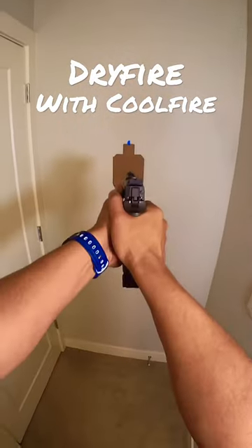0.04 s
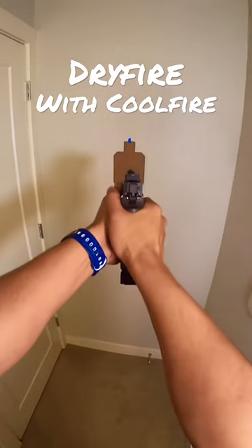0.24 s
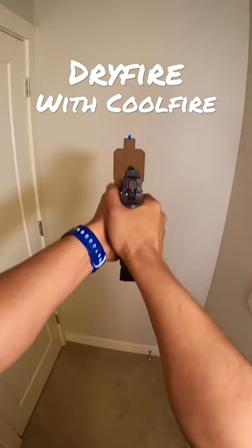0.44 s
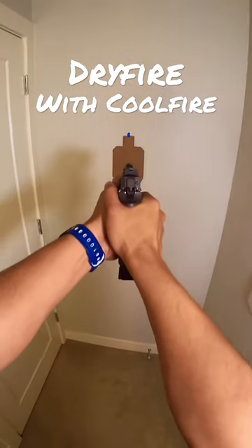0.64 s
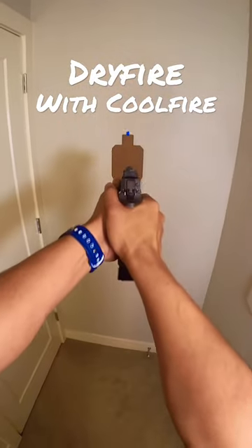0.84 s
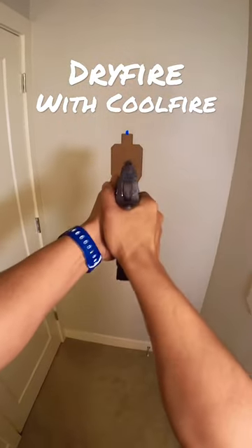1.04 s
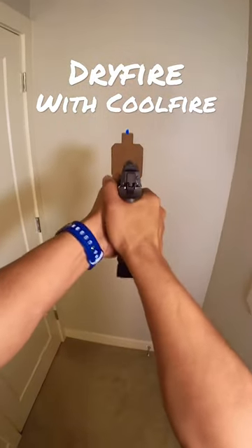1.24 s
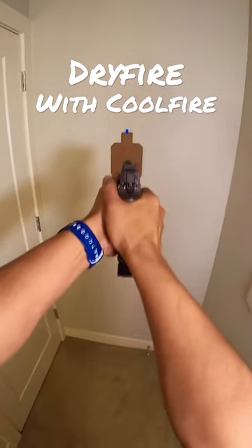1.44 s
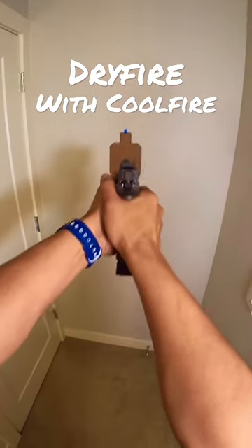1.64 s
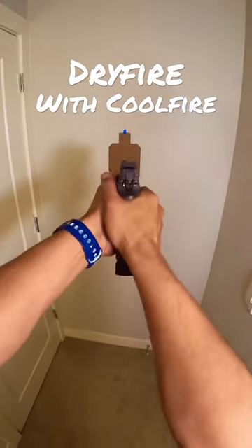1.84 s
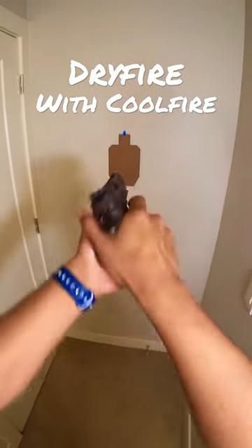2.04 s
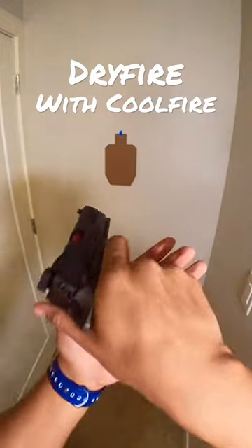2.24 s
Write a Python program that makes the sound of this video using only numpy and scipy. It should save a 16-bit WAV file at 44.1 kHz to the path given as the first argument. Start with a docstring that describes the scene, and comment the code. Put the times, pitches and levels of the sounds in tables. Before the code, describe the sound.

A gas-recoil training pistol fires ten rapid shots close by in a small bare room. Tiny trigger clicks come at about 0.2 seconds, then the shots follow at once, nearly six a second, the last slightly delayed at 1.9 seconds. Each is a pop, gas hiss and ringing slide clatter, blurred by boomy reverberation. Around 2.3 seconds, hands rub softly on the grip over faint air noise.

```python
"""A pistol with a gas recoil trainer is fired ten times in a small bare room.
Over faint air noise, the trigger is taken up with small scraping clicks. In each cycle the hammer
falls, the valve pops, gas puffs out, and the slide hits its rear stop and slams shut, ringing.
The room booms and reverberates; a limiter holds it at one level, so the shots run together as
noisy bursts. Last, the hands rub softly on the grip."""
import sys
import numpy as np
from scipy import signal
from scipy.fft import rfft, irfft
from scipy.io import wavfile
from scipy.ndimage import uniform_filter1d

SR = 44100
rng = np.random.default_rng(int(sys.argv[2]) if len(sys.argv) > 2 else 0)


def bounce(signal):
    """Save signal as a 16-bit WAV file at the path given by the first command-line argument."""
    frames = np.transpose(np.atleast_2d(signal))
    limited = np.clip(frames, -1, 1)
    pcm = np.round(limited * 32767).astype(np.int16)
    wavfile.write(sys.argv[1], SR, pcm)


N = 105840
T = np.arange(N) / SR

# background air spectrum: f/Hz, level/dB
AIR_SPECTRUM = [(18, -67), (30, -27.5), (200, -9.5), (426, -11), (485, -14), (3070, -21.5), (8920, -31.5),
                (9890, -25), (10700, -36), (15000, -44.5)]
# reverb spectrum: f/Hz, level/dB
REVERB_SPECTRUM = [(100, -13.5), (300, 7.5), (500, 7.5), (900, 10), (1500, 2.5), (3000, -2.5), (6000, 6.5),
                   (10000, 3), (15000, -13)]
# reverb decay: f/Hz, t60/s
REVERB_DECAY = [(150, .38), (400, .37), (900, .42), (1500, .37), (3500, .37), (7000, .325), (14000, .23)]
# reverb that stays the same as the pistol moves between shots: f/Hz, power share
REVERB_SHARED = [(500, .97), (1000, .8), (2000, .5), (6000, .3)]
# low room modes: f/Hz, level/dB
ROOM_MODES = [(150, -53.5), (214, -43.5), (287, -44.5), (349, -44.5), (452, -48), (500, -51.5), (587, -42),
              (700, -51.5), (846, -56.5), (890, -59.5)]
# wall echoes of the gas: delay/s, level/dB
WALL_ECHOES = [(.0148, 3), (.0208, -3), (.0275, 3.5)]
# trigger take-up: t/s, level/dB, decay/s, low-pass/Hz
TRIGGER_CLICKS = [(0.189, -57, 0.0033, 8000), (0.202, -39.5, 0.0034, 2700), (0.2159, -35, .004, 5650),
                  (0.222, -22.5, 0.0016, 4493)]
# valve pop and exhaust puff: delay/s, level/dB, low edge/Hz, high edge/Hz
GAS_PULSES = [(-.0003, 26.5, 650, 2400), (.0051, 26, 175, 930)]
# metal contact spectrum: f/Hz, level/dB
CLACK_SPECTRUM = [(60, -42), (150, -22), (400, -6), (1000, -9.5), (1750, 2.5), (2500, 7), (3000, 2),
                  (4300, 1.5), (6000, -0.5), (8600, -2), (10300, 3), (11500, -4.5), (15500, -10)]
# slide and barrel modes: f/Hz, level/dB, t60/s
GUN_MODES = [(1440, -33, .022), (1744, -37, .013), (3285, -30.5, .032), (5530, -44, .012),
             (6550, -34, .028), (6700, -33.5, .022), (7680, -34, .012), (7820, -39, .025)]
# contacts per cycle: delay/s, level/dB, decay/s, low-pass/Hz, low ring/dB, mid ring/dB, high ring/dB
CYCLE_CONTACTS = [(-.0058, -7, 0.0058, 5730, 6, -15.5, -12), (.0117, 0, .003, 4110, -3, -10.5, -19),
                  (.0183, -5.5, 0.012, 7100, 0.5, 9, -13), (0.0294, -5, 0.0055, 6752, 10, 9, 2.5),
                  (.0405, -4.5, 0.012, 7720, -0.5, 3, 4.5), (.056, -11, .012, 6000, 4, 8.5, 9.5),
                  (.076, -3.5, 0.0026, 2846, 3, 3, 1), (.098, -13, 0.031, 5516, 1.5, -1.5, -4)]
# shots, timed at the valve pop: t/s, level/dB, ring pitch ratio, low ring/dB, mid ring/dB, high ring/dB
SHOT_CYCLES = [(.2349, -1.5, 1.012, 1, -2.5, 1.5), (.4324, 0, 1.006, 1.5, 0, 0),
               (.6043, 0, 1.004, 2, -1.5, 1), (.7844, 0, 1.0, 0, 1.5, 1), (.9617, -.5, .999, 2, -1.5, 0),
               (1.1273, -.5, .999, -1, .5, -1.5), (1.3044, -1, .999, 0, -.5, 0),
               (1.4768, -1.5, .999, 0, -1.5, 0), (1.646, -3.5, 1.0, 0, -.5, .5),
               (1.8953, -3, 1.001, -7, -2.5, -3)]


def from_db(db):
    """Decibels to gain."""
    return 10 ** (np.asarray(db) / 20)


def at_hz(points, hz):
    """Table lookup on a log-frequency axis."""
    f, v = np.transpose(points)
    return np.interp(np.log(np.maximum(hz, 1)), np.log(f), v)


def band(x, hz, kind, order=2):
    """Butterworth filter."""
    sos = signal.butter(order, np.clip(hz, 10, .45 * SR), kind, fs=SR, output="sos")
    return signal.sosfilt(sos, x + 1e-18)


def add(out, start_s, x):
    """Mix x into out at start_s."""
    i = max(int(start_s * SR), 0)
    out[i:i + len(x)] += x[:len(out) - i]


def ring(x, hz, t60_s):
    """One decaying mode driven by x."""
    r, w = from_db(-60 / (t60_s * SR)), 2 * np.pi * hz / SR
    return signal.lfilter([.5, 0, -.5], [1, -2 * r * np.cos(w), r * r], x + 1e-18)


def air(rms_db=-71):
    """Steady background air: coloured noise."""
    colour = from_db(at_hz(AIR_SPECTRUM, np.fft.rfftfreq(N, 1 / SR)))
    noise = irfft(rfft(rng.standard_normal(N)) * colour, N)
    return from_db(rms_db) * noise / noise.std()


def room_tails(places, gain_db=-32, delay_s=.00024, build_s=.0025, size=32768):
    """Diffuse reverb, one response per pistol position: fast build-up, treble dies first."""
    hz, t = np.fft.rfftfreq(size, 1 / SR), T[:size]
    share = at_hz(REVERB_SHARED, hz)
    common = np.sqrt(share) * rfft(rng.standard_normal(size))
    local = np.sqrt(1 - share) * rfft(rng.standard_normal((places, size)))
    spectra = (common + local) * from_db(at_hz(REVERB_SPECTRUM, hz) + gain_db)
    edges_hz, tails = np.geomspace(60, 18000, 15), 0
    for low_hz, high_hz in zip(edges_hz, edges_hz[1:]):
        t60_s = at_hz(REVERB_DECAY, np.sqrt(low_hz * high_hz))
        in_band = (hz >= low_hz) & (hz < high_hz)
        tails += irfft(spectra * in_band) * from_db(-60 * t / t60_s)
    return tails * (1 - np.exp(-np.maximum(t - delay_s, 0) / build_s))


def room_boom(puffs, t60_s=.39, echo_edge_hz=380):
    """Gas puffs drive the low room modes and bounce off the walls as dull echoes."""
    out = sum(from_db(db) * ring(puffs, hz, t60_s) for hz, db in ROOM_MODES)
    dull = band(puffs, echo_edge_hz, "low")
    for delay_s, db in WALL_ECHOES:
        add(out, delay_s, from_db(db) * dull)
    return out


def grip_rub(centre_s=2.27, width_s=.02, level_db=-52.5, band_hz=(1050, 1750)):
    """Hands slide on the grip as it is released: a soft swell of noise."""
    rub = band(rng.standard_normal(N), band_hz, "band")
    swell = np.exp(-.5 * ((T - centre_s) / width_s) ** 2)
    return from_db(level_db) * rub / rub.std() * swell


def clack(decay_s, edge_hz, size=4096):
    """Metal on metal: a short, coloured noise burst."""
    burst = rng.standard_normal(size) * np.exp(-T[:size] / decay_s)
    colour = from_db(at_hz(CLACK_SPECTRUM, np.fft.rfftfreq(2 * size, 1 / SR)))
    crunch = irfft(rfft(burst, 2 * size) * colour)[:size]
    return 2 * band(crunch, edge_hz, "low")


def trigger(low_cut_hz=1450):
    """Trigger take-up before the first shot: small scraping clicks."""
    out = np.zeros(N)
    for start_s, db, decay_s, edge_hz in TRIGGER_CLICKS:
        add(out, start_s, from_db(db) * band(clack(decay_s, edge_hz), low_cut_hz, "high"))
    return out


def gas(shot_s, hiss_db=-8, rise_s=.0056, decay_s=.052, hiss_low_hz=3580, hiss_high_hz=10370):
    """Sharp valve pop, duller exhaust puff, and a hiss of escaping gas that swells and fades."""
    out, impulse = np.zeros(N), signal.unit_impulse(SR // 2)
    for delay_s, db, low_hz, high_hz in GAS_PULSES:
        add(out, shot_s + delay_s, -from_db(db) * band(impulse, [low_hz, high_hz], "band"))
    t = T[:len(impulse)]
    jet = rng.standard_normal(len(t)) * (1 - np.exp(-t / rise_s)) * np.exp(-t / decay_s)
    hiss = band(band(jet, hiss_low_hz, "high"), hiss_high_hz, "low", order=6)
    add(out, shot_s, from_db(hiss_db) * hiss)
    return out


def hammer_and_slide(shot_s, pitch, shot_ring_db, jitter_s=.0004, spread_db=.8, splits_hz=(2500, 5000)):
    """One cycle: each contact clacks and rings the gun's low, mid and high modes."""
    out = np.zeros(N)
    for delay_s, db, decay_s, edge_hz, *contact_ring_db in CYCLE_CONTACTS:
        hit = clack(decay_s, edge_hz)
        group_db = np.add(shot_ring_db, contact_ring_db)
        rings = sum(from_db(mode_db + group_db[np.digitize(hz, splits_hz)]) * ring(hit, hz * pitch, t60_s)
                    for hz, mode_db, t60_s in GUN_MODES)
        gain = from_db(db + spread_db * rng.standard_normal())
        start_s = shot_s + delay_s + jitter_s * rng.standard_normal()
        add(out, start_s, gain * (hit + rings))
    return out


def scene(trigger_send_db=7, gas_send_db=-4.5, low_cut_hz=135):
    """Pistol, room, grip rub and air, in mono."""
    tails, take_up, puffs = room_tails(len(SHOT_CYCLES)), trigger(), 0
    out = take_up + from_db(trigger_send_db) * signal.fftconvolve(take_up, tails[0])[:N]
    for (shot_s, db, pitch, *ring_db), tail in zip(SHOT_CYCLES, tails):
        puff = from_db(db) * gas(shot_s)
        metal = from_db(db) * hammer_and_slide(shot_s, pitch, ring_db)
        reverb = signal.fftconvolve(metal + from_db(gas_send_db) * puff, tail)[:N]
        out += puff + metal + reverb
        puffs += puff
    pistol_in_room = band(out + room_boom(puffs), low_cut_hz, "high", order=4)
    return (pistol_in_room + grip_rub() + air())[None]


def record(dry, limit_db=-18.5, sense_s=.0054, attack_s=.015, release_db_per_s=215, stopband_hz=16400):
    """Fast look-ahead limiter, soft clip, steep low-pass."""
    power = np.maximum(uniform_filter1d(dry[0] ** 2, int(sense_s * SR)), 1e-14)
    over_db = np.maximum(10 * np.log10(power) - limit_db, 0)
    release_db = release_db_per_s * T
    held_db = np.maximum.accumulate(over_db + release_db) - release_db
    limited = dry * from_db(-uniform_filter1d(held_db, int(attack_s * SR)))
    low_pass = signal.cheby2(14, 70, stopband_hz, fs=SR, output="sos")
    return signal.sosfilt(low_pass, np.tanh(limited))


dry = scene()
out = record(dry)
bounce(out)
```